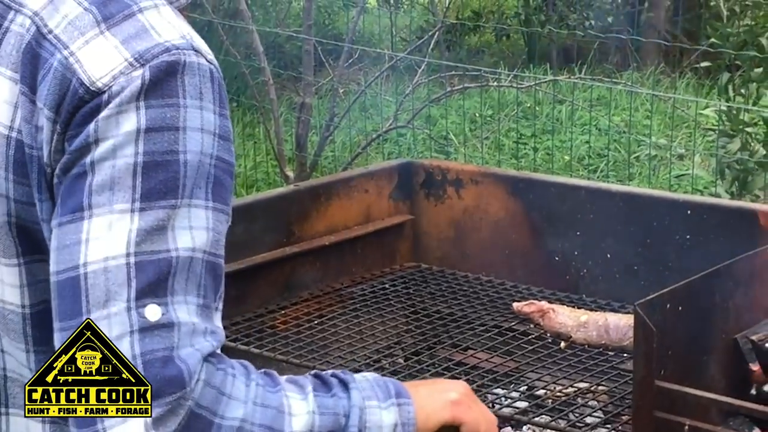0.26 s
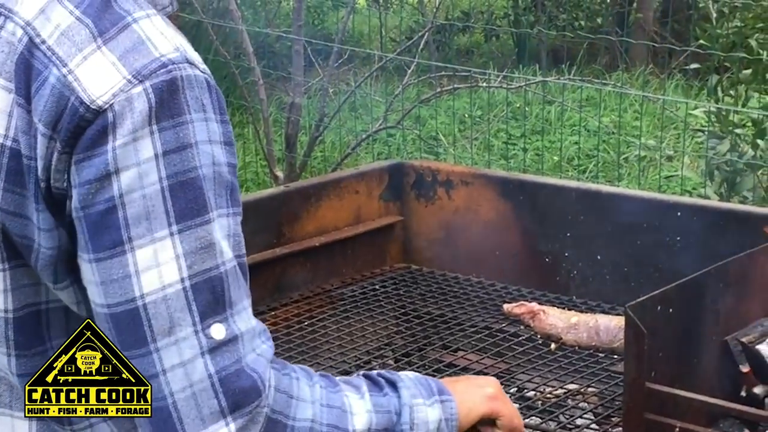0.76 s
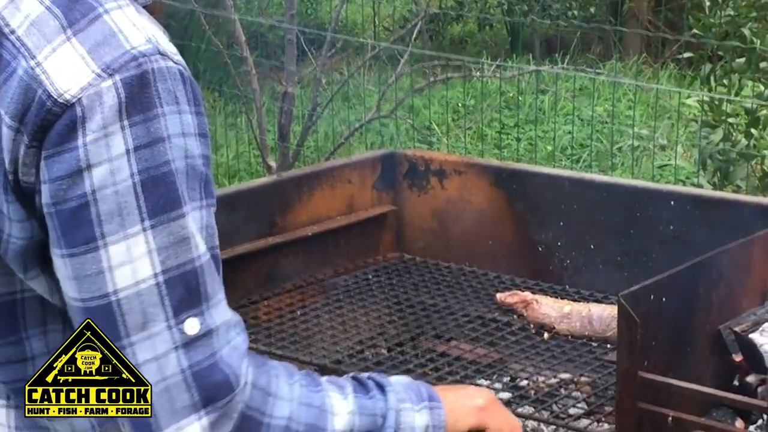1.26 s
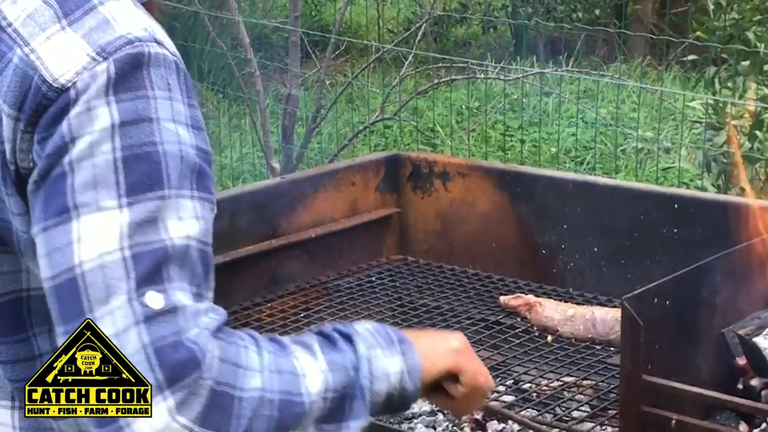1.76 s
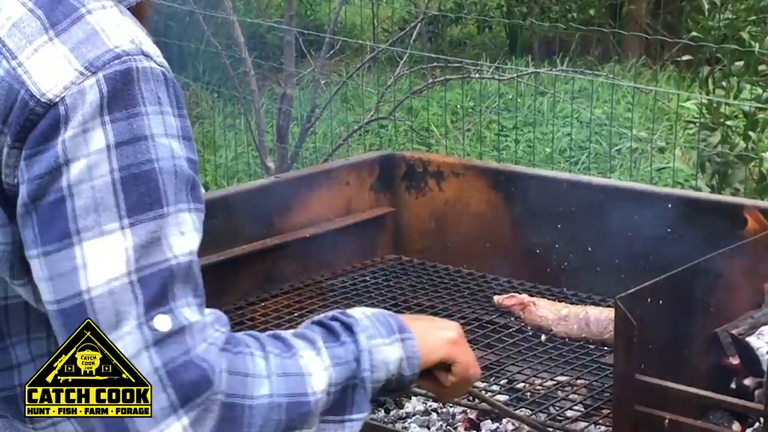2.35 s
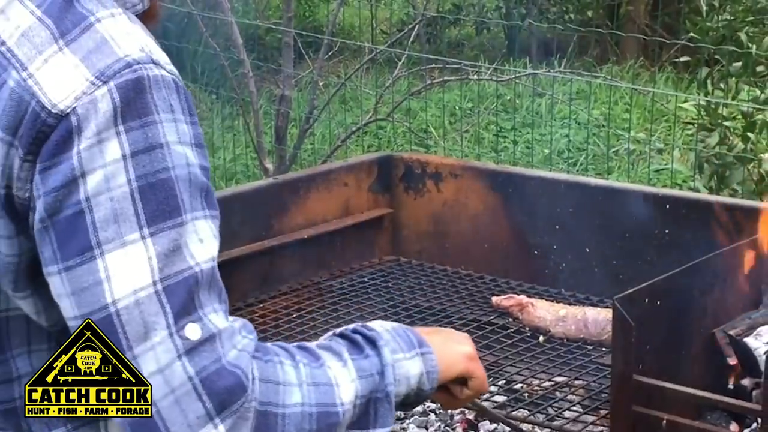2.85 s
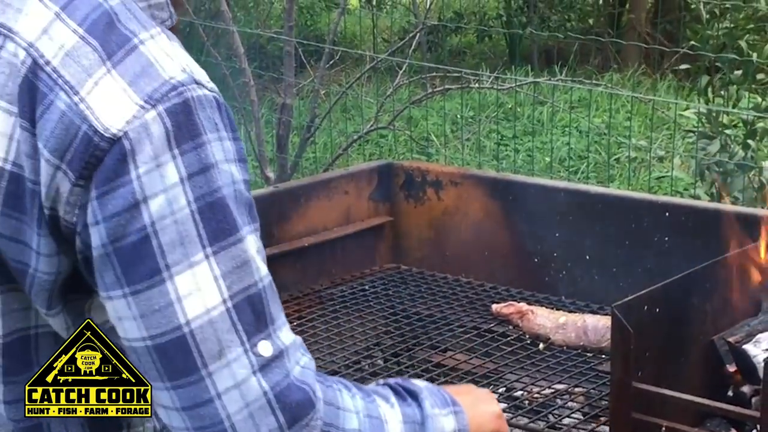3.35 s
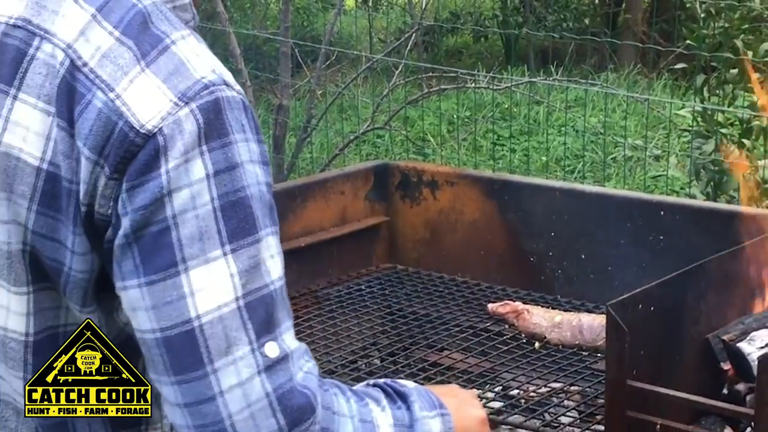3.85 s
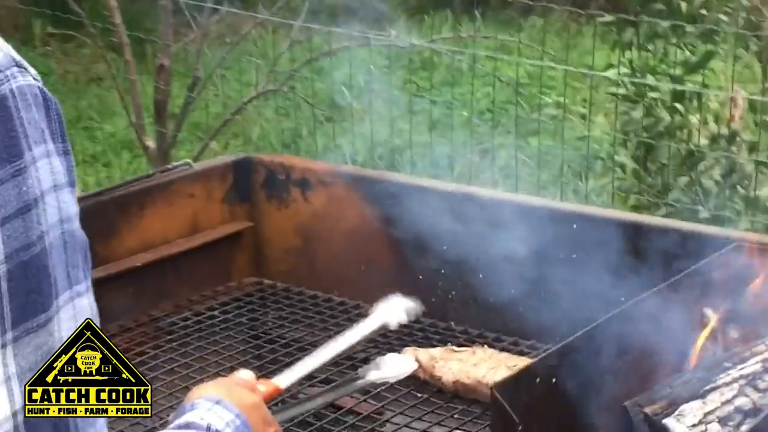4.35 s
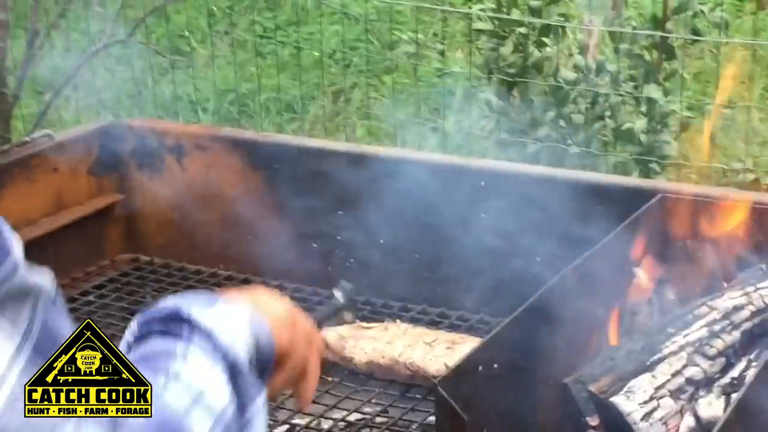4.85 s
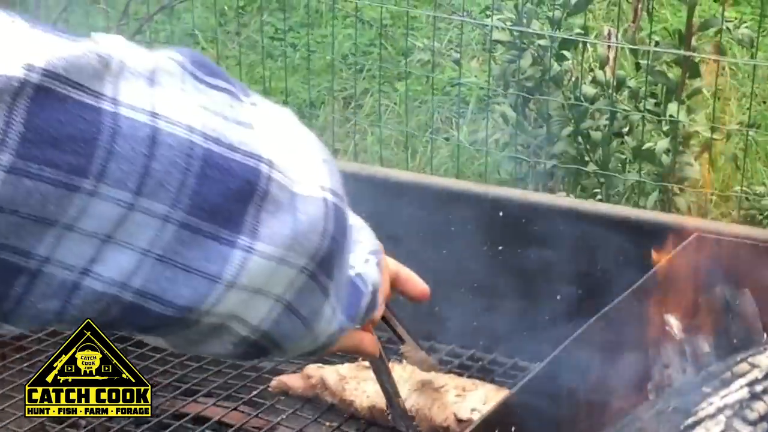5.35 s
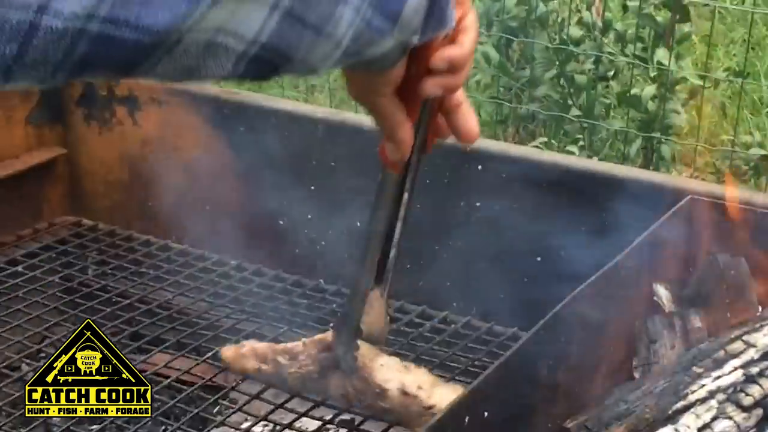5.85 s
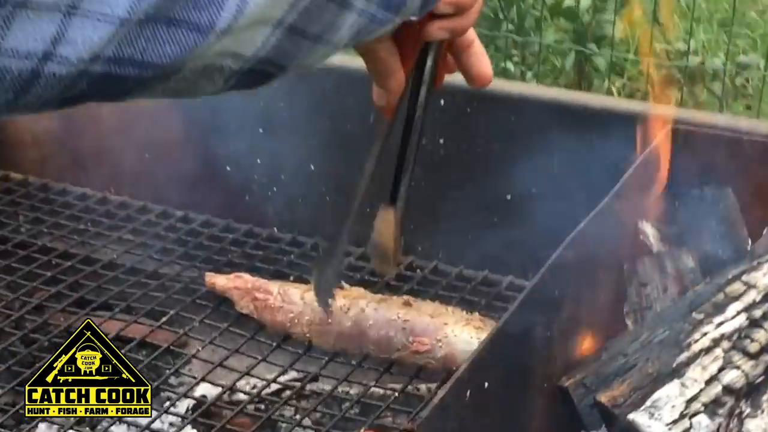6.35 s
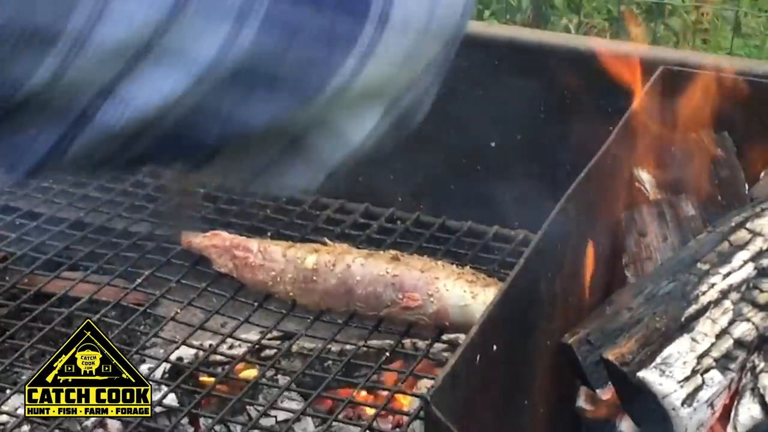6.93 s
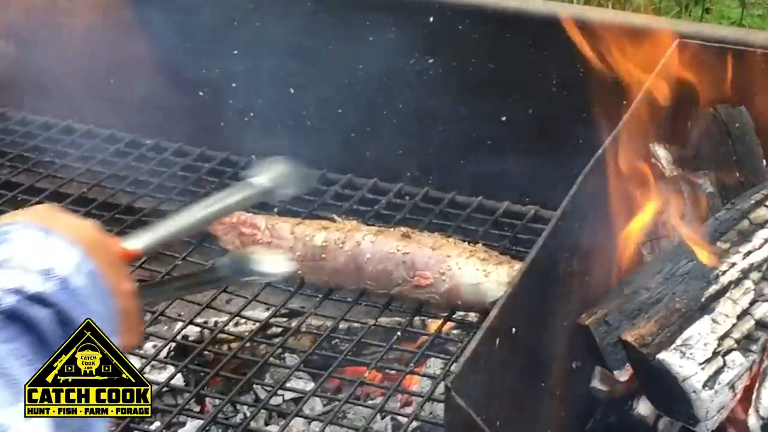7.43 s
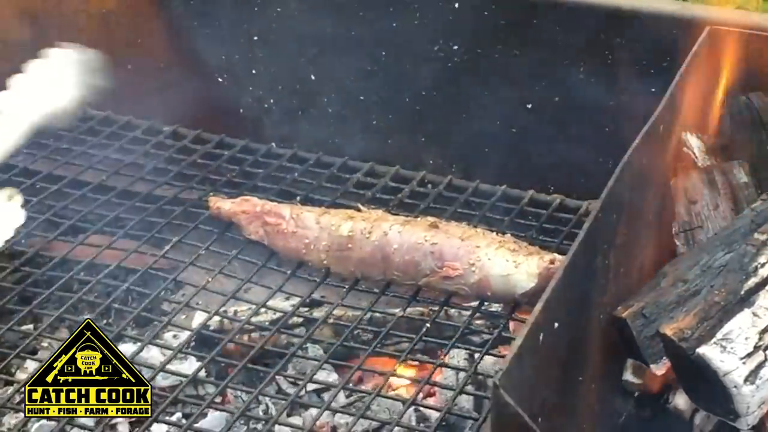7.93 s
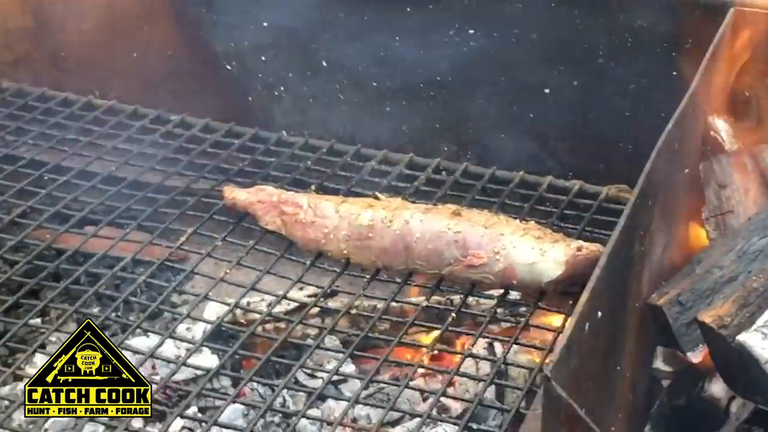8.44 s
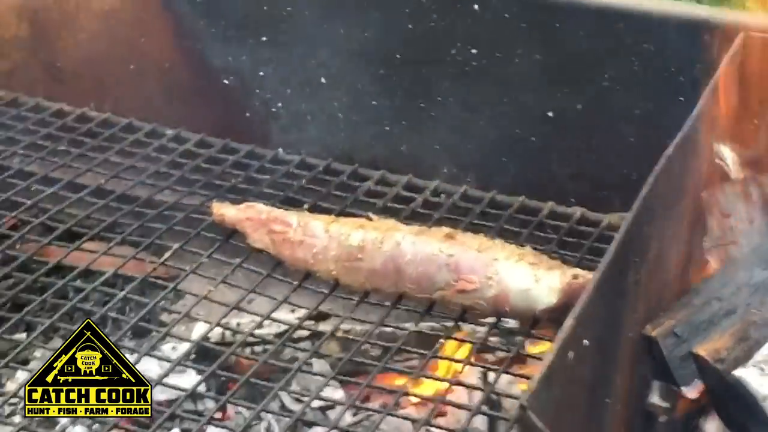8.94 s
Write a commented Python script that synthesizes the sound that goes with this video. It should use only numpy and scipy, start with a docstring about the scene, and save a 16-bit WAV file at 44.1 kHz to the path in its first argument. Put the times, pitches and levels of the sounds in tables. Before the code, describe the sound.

Close outdoors, steel tongs strike a grill grate and its sheet-metal sides in irregular clanks, dull thuds and small ticks for four seconds, over faint flame rumble. A fine sizzle then comes nearer, with spits and short scrapes. A hard snap of the tongs rings out as the meat is turned, and the sizzle flares, settling into steady bright frying with sharp pops and fire flutter.

```python
"""Tongs on an outdoor grill

Steel tongs knock and scrape about the grate of a wood-fired grill, close to the microphone in open air.
Each blow rings modes of the grate and sheet-steel firebox; the tongs snap shut and the meat is turned.
Its wet side sizzles as showers of random grains and spits as noise puffs, over the soft flutter of flames.
"""
import sys
import numpy as np
from scipy import signal
from scipy.fft import rfft, irfft, next_fast_len
from scipy.io import wavfile

SR = 44100
rng = np.random.default_rng(int(sys.argv[2]) if len(sys.argv) > 2 else 0)


def unload_wav(signal):
    """Save mono or channel-first audio to the path in sys.argv[1] as 16-bit WAV at rate SR, clipped to [-1, 1]."""
    wavfile.write(
        sys.argv[1],
        SR,
        np.round(np.clip(np.atleast_2d(signal).T, -1, 1) * 32767).astype(np.int16),
    )


N = 405279
TIME = np.arange(N) / SR

# Blows. A blow clangs up to the frequency at which the tip springs on the steel; its weight thuds in the bass.
TIP_Q, CLANG_LOW_HZ, THUD_HZ = 1.26, 420, 333
CHAR_DB = -71.5  # faint tick of char crushed at every contact
BEND_SPEED = 5.4  # bending waves in the steel travel at this many m/s times the root of their Hz
NODE_SHARE = 0.14  # power that a mode still takes when struck at a node
# how each struck part shares its blow: part -> (grate [dB], firebox [dB], side wall [dB])
PART_COUPLING = {"grate": (0.33, -29, -14.5), "box": (-5, 4.9, -12), "wall": (-7, -11, 4)}
# knocks of the tongs, and a late tap or wood pop: (time [s], struck part, spot from the edge [m],
# clang [dB], tip [Hz], thud [dB], contact [ms], ring length [factor], flexing [dB])
BLOWS = [ (0.000, "grate", 0.19, -50.5, 3060, -44, 0.34, 1.22, -44.5),
         (0.095, "wall", 0.32, -55.5, 1800, -49, 4.5, 0.99, -45.5),
         (0.416, "wall", .189, -43, 1630, -50, 5.9, 1.04, -66),
         (0.492, "grate", 0.14, -38, 5000, -40.5, 1.9, 1.18, -50),
         (0.604, "grate", .572, -62.5, 3800, -43.5, 4.8, 0.52, -76),
         (0.674, "box", .586, -59.5, 2300, -54, 17, 0.49, -67.5),
         (0.912, "box", 0.047, -68, 2100, -42.5, 1, 0.39, -59.5),
         (1.041, "grate", 0.4, -78, 2500, -61, 13, 0.64, -68),
         (1.283, "box", 0.13, -37.5, 1100, -45, 5.5, 1.2, -59),
         (1.401, "wall", .57, -55.5, 6360, -40, 1.7, 0.87, -78),
         (1.516, "box", .589, -67.5, 8550, -52.5, 23, 1.3, -74),
         (1.612, "box", .311, -66, 3880, -54, 5.6, 1.25, -72),
         (1.868, "box", 0.28, -61.5, 2300, -40.5, 1.7, 0.47, -54),
         (1.994, "grate", .342, -33.5, 5000, -40.5, 1.4, 1.08, -59),
         (2.120, "wall", 0.38, -62.5, 3700, -48, 5.4, 1.6, -73),
         (2.165, "grate", .448, -53, 4700, -45.5, 6, 1.4, -71),
         (2.222, "wall", .535, -55, 1600, -47, 13, 0.75, -78),
         (2.271, "wall", 0.084, -54.5, 3400, -40.5, 12, 0.7, -77),
         (2.448, "wall", 0.425, -47.5, 2530, -48.5, 7.4, 1.24, -41.5),
         (2.622, "grate", 0.45, -33, 4960, -36, 1.6, 1.05, -45),
         (2.766, "grate", .352, -61.5, 7550, -46.5, 6.6, 3.6, -57),
         (2.851, "wall", .525, -42.5, 5500, -39.5, 6.9, 1.24, -42),
         (2.977, "grate", 0.17, -59.5, 2800, -53, 2.8, 0.36, -66),
         (3.366, "wall", .224, -55, 810, -60, 0.72, 0.37, -80),
         (3.396, "wall", .586, -69.5, 2430, -50.5, 2, 0.76, -71),
         (3.705, "wall", 0.055, -48.5, 2270, -53, 4, 1.11, -66),
         (3.943, "box", .291, -56.5, 1300, -67, 2.2, 0.48, -83),
         (3.967, "wall", .592, -63.5, 2080, -46, 1.4, 0.78, -71),
         (8.879, "wall", 0.44, -57, 1700, -70, 1.6, 0.18, -80)]
# modes of the grate: (frequency [Hz], level [dB], t60 before the ring length [s])
GRATE_MODES = [(355, -10, .35), (460, -11, .49), (625, -12, .28), (681, -10, .28), (748, -11, .25),
               (907, -9, .28), (934, -1.5, .48), (1110, -10, .3), (1449, -4, .35), (1529, -8, .29),
               (1631, -11, .24), (1830, -12, .18), (1925, -4, .22), (2043, -4, .2), (2303, -5, .23),
               (2355, -7, .2), (2494, -3.5, .27), (2848, -12, .16), (2898, -12, .2), (3168, -11, .19),
               (3591, -17, .17), (4237, -10, .15), (4428, -5.5, .14), (4896, -6.5, .14), (5505, -13, .14),
               (5750, -13, .13), (6456, -10, .14), (6777, -2.5, .11), (7262, -7, .08)]
# modes of the firebox: (frequency [Hz], level [dB], t60 before the ring length [s])
FIREBOX_MODES = [(368, -10, .3), (419, -2, .33), (511, -5, .27), (538, -2, .33), (584, -9, .25),
                 (791, -9, .28), (1012, -11, .4), (1720, -9, .16), (2106, -11, .2)]
# modes of the side wall: (frequency [Hz], level [dB], t60 before the ring length [s])
SIDE_WALL_MODES = [(289, -5, .45), (318, -8, .45), (581, -11, .3), (657, -9, .3), (885, -6, .28),
                   (1001, -10, .25), (1146, -9, .3), (1210, -5, .28), (1265, -7, .25), (1378, -11, .3),
                   (1510, -9, .25), (1652, -11, .2), (1781, -7, .2), (1868, -8, .18), (2130, -11, .18),
                   (2400, -10, .2), (2475, -10, .18), (3598, -8, .15)]
# the whole grate flexing in its frame: (frequency [Hz], level [dB], t60 before the ring length [s])
FLEX_MODES = [(256, -1, 1.15)]
# decay of the crowd of weaker steel modes: (frequency [Hz], t60 before the ring length [s])
CROWD_T60 = [(100, .35), (300, .38), (1000, .24), (2500, .15), (5000, .105), (8000, .085), (14000, .075)]
# strength of that crowd: (frequency [Hz], level per third octave [dB])
CROWD_LEVEL = [(60, -30), (125, -13), (200, -13.5), (300, -7), (500, -11.5), (1000, -7), (2200, -6),
               (3200, -6), (4100, -3), (5200, -5), (6500, -3), (8000, -3.5), (10500, -6.5), (15000, -2)]
# an even drive at all frequencies: (frequency [Hz], level [dB])
EVEN_DRIVE = [(100, 0), (10000, 0)]

# the flames grow louder as the microphone moves in over the grill: (time [s], level [dB])
FLAME_LEVEL = [(0, -61), (5.05, -62.5), (5.5, -55), (9.19, -55.5)]
# spectrum of the flames: (frequency [Hz], level [dB])
FLAME_SPECTRUM = [(20, -35), (35, -38), (55, -4), (100, -1.5), (155, 3), (195, -0.5), (240, -7.5),
                  (290, -4.5), (360, -15.5), (500, -22.5), (1000, -28)]
# spectrum of the open air: (frequency [Hz], level [dB])
AIR_SPECTRUM = [(15, -43), (30, -2), (55, 17), (110, 1.5), (400, -12), (650, -3), (1200, -2.5),
                (2000, -8.5), (4000, -11.5), (8000, -40), (16000, -29)]
AIR_DB = -68

SIMMER_DB = -74  # the meat lying undisturbed
SETTLED_DB, SETTLE_S, DRYING_DB_PER_S = -1.5, 0.73, 1.5  # how each rise of the sizzle dies down
FRY_DB, FRY_GROWTH = -49.5, 1.134  # coarse frying at the height of the sizzle; its dB per dB of fine fizz
# the sizzle comes nearer at 4 s, then flares as the meat is turned and set down:
# (time [s], level [dB], rise [s])
SIZZLE_RISES = [(4.0, -66.5, 0.21), (5.71, -53.5, 0.26), (6.12, -51.5, 0.16)]
# spectrum of the fine fizz: (frequency [Hz], level [dB])
FIZZ_SPECTRUM = [(1500, -40), (4000, -3), (6200, -1.5), (7700, -4.5), (9200, 3.5), (10500, -5), (11800, 2),
                 (16000, -5.5)]
# spectrum of the coarse frying: (frequency [Hz], level [dB])
FRY_SPECTRUM = [(400, -20), (900, -9), (1300, -8.5), (1750, 1.5), (2120, 3), (2350, -1.5), (3500, 0),
                (4900, -6), (5600, -0.5), (7500, -8.5), (12000, -2)]
# the loudest spits of fat, and the bright tick of the knock at 3.94 s: (time [s], level [dB], centre [Hz])
LOUD_SPITS = [(0.538, -45, 9000), (1.044, -52, 9100), (3.129, -55, 6900), (3.947, -49, 10000),
              (4.675, -47.5, 8900), (4.834, -48.5, 9000), (5.283, -47, 11000), (5.543, -45.5, 11000),
              (6.245, -40, 6460), (6.379, -35, 8000), (8.274, -42, 10200), (8.46, -37.5, 12100),
              (8.566, -33, 10900), (8.963, -40, 12000)]
SPIT_T60_S = 0.021

# steel dragged over the grate: (time [s], length [s], level [dB], top [Hz])
DRAGS = [(2.09, 0.28, -51, 6800), (5.396, 0.054, -45.5, 6050), (5.44, 0.17, -53.5, 6900),
         (5.52, 0.16, -54, 720), (8.705, 0.036, -52.5, 5070), (9.023, 0.032, -50.5, 5030)]
# spectrum of the dragging: (frequency [Hz], level [dB])
DRAG_SPECTRUM = [(100, -8), (250, -1.5), (650, -1), (950, -9), (1300, -6.5), (1600, -12.5), (2000, 1.5),
                 (3000, -14.5), (6000, -13), (15000, -15)]
# the tongs snap shut: (time [s], level [dB], pitch of the contact [Hz])
JAW_SNAPS = [(6.1328, -16.5, 4730), (7.9154, -38.5, 3030), (7.9556, -26, 2340)]
# modes of the tong arms: (frequency [Hz], level [dB], t60 before the ring length [s])
TONG_MODES = [(1120, -8.5, 0.031), (2180, -6.5, 0.024), (2780, -2.5, 0.014), (2880, -28, 0.077),
              (3460, -15.5, 0.093), (3540, -8, 0.032), (4760, -9, 0.025), (6100, -17, 0.04),
              (6790, 5.5, 0.014), (8899, -35, .04)]
TOP_HZ = 16050  # upper limit of the sound


def undb(db):
    """Decibels to gain."""
    return 10 ** (np.asarray(db) / 20)


def unit(x):
    """Scale to rms 1."""
    return x / np.sqrt(np.mean(x ** 2) + 1e-18)


def at_pitch(hz, points):
    """Read (Hz, value) points on a log-frequency axis."""
    f, value = np.transpose(points)
    return np.interp(np.log(hz + 1e-9), np.log(f), value)


def curves(rows):
    """Each column of a (time, ..) table at every sample."""
    s, *columns = np.transpose(rows)
    return [np.interp(TIME, s, column) for column in columns]


def colour(x, points):
    """Give x a (Hz, dB) spectrum; rms 1."""
    size = next_fast_len(len(x))
    hz = np.arange(size // 2 + 1) * SR / size
    spectrum = rfft(x, size) * undb(at_pitch(hz, points))
    return unit(irfft(spectrum, size)[:len(x)])


def band(x, hz, ratio, order=2):
    """Band-pass from hz / ratio to hz * ratio, kept below the Nyquist limit; rms 1."""
    edges = [min(hz / ratio, SR / 3), min(hz * ratio, SR / 2 - 100)]
    return unit(signal.sosfilt(signal.butter(order, edges, "band", fs=SR, output="sos"), x))


def walk(rate):
    """Random wander through `rate` chance values a second; rms 1."""
    knots = rng.standard_normal(4096)
    return unit(np.interp(TIME * rate, np.arange(len(knots)), knots))


def fade(t, t60):
    """Free decay, 60 dB in t60 seconds."""
    return np.exp(-np.log(1000) * t / t60)


def add(out, s, x):
    """Mix x into out from time s."""
    i = max(int(s * SR), 0)
    out[i:i + len(x)] += x[:N - i]


def grains(rate, spread_db):
    """Random clicks, `rate` a second on average: many small ones, a few large."""
    size = undb(spread_db * np.minimum(rng.exponential(size=N), 7))
    happens = rng.random(N) < rate / SR
    return happens * size * rng.choice([-1, 1], N)


def ring(modes, t, length, tint, scatter_db=1):
    """Decaying modes, weighted by the (Hz, dB) tint; each mode's level varies a little, its phase is random."""
    chance = rng.standard_normal((len(modes), 2))
    total = 0
    for (hz, db, t60), (luck, phase) in zip(modes, chance):
        gain = undb(db + at_pitch(hz, tint) + scatter_db * luck)
        total = total + gain * fade(t, t60 * length) * np.sin(2 * np.pi * (hz * t + phase))
    return total


def puff(t, hz, ratio, t60, order=2):
    """A short burst of band noise; rms 1 over its first two milliseconds."""
    lead = SR // 100  # lets the filter settle
    noise = band(rng.standard_normal(len(t) + lead), hz, ratio, order=order)[lead:]
    burst = noise * fade(t, t60)
    return burst / np.sqrt(np.mean(burst[:SR // 500] ** 2))


def blow(hz, clang_db, tip_hz, thud_db):
    """Strength (dB) with which a blow drives each frequency: springy tip, weight behind it, crushed char."""
    r = hz / tip_hz
    spring = 1 / ((1 - r ** 2) ** 2 + (r / TIP_Q) ** 2)
    clang = undb(clang_db) ** 2 * spring / (1 + (CLANG_LOW_HZ / hz) ** 2)
    thud = undb(thud_db) ** 2 / (1 + (hz / THUD_HZ) ** 4)
    return 10 * np.log10(clang + thud + undb(CHAR_DB) ** 2)


def struck_at(modes, spot_m):
    """Each mode is a standing bending wave: it answers most where the blow lands on one of its crests."""
    answering = []
    for hz, db, t60 in modes:
        swing = np.cos(2 * np.pi * spot_m * np.sqrt(hz) / BEND_SPEED) ** 2
        power = NODE_SHARE + 2 * (1 - NODE_SHARE) * swing
        answering.append((hz, db + 10 * np.log10(power), t60))
    return answering


def weak_modes():
    """Three seconds of steady partials of unequal strength, on average one every 25 Hz above 600 Hz."""
    size = 3 * SR // 2 + 1  # bins a third of a hertz apart
    strength = (rng.random(size) < 1 / 75) * undb(3 * rng.standard_normal(size))
    # below 600 Hz the modes crowd into an even, low rumble
    strength[:1800] = 0.17
    return irfft(strength * np.exp(2j * np.pi * rng.random(size)))


def knocks(modes_db=2.5, bass_lag_ms=3, blow_s=0.05, crack_db=3, crack_t60=0.026):
    """Each blow cracks, then rings the grate, the firebox, the side wall and a crowd of weaker steel modes."""
    out, t = np.zeros(N), np.arange(SR) / SR
    ms = t * 1000
    centres = 63 * 2 ** (np.arange(25) / 3)  # third octaves [Hz]
    partials = weak_modes()
    crowd = [band(partials, hz, 2 ** (1 / 6), order=3) for hz in centres]
    span = SR // 2
    short_t, short_ms = t[:span], ms[:span]
    for s, part, spot_m, clang_db, tip_hz, thud_db, contact_ms, length, flex_db in BLOWS:
        tint = list(zip(centres, blow(centres, clang_db, tip_hz, thud_db)))
        clear = undb(flex_db) * ring(FLEX_MODES, t, 0.98, EVEN_DRIVE)
        for db, modes in zip(PART_COUPLING[part], (GRATE_MODES, FIREBOX_MODES, SIDE_WALL_MODES)):
            clear = clear + undb(db) * ring(struck_at(modes, spot_m), t, length, tint)
        add(out, s, undb(modes_db) * clear * (1 - np.exp(-(ms / contact_ms) ** 2)))
        start = rng.integers(SR, 2 * SR)
        for hz, partial in zip(centres, crowd):
            # bending waves are slower in the bass, so the lows build up later
            rise_ms = contact_ms + bass_lag_ms * min(700 / hz, 1.5)
            rise = 1 - np.exp(-(short_ms / rise_ms) ** 2)
            # the treble leaves the contact point as a short crack before the ring takes over
            crack = undb(crack_db) * min(hz / 3500, 1) * fade(short_t, crack_t60)
            shape = rise * (crack + fade(short_t, at_pitch(hz, CROWD_T60) * length))
            shape /= np.sqrt(np.mean(shape[:int(blow_s * SR)] ** 2))
            gain = undb(at_pitch(hz, tint) + at_pitch(hz, CROWD_LEVEL))
            add(out, s, gain * shape * partial[start:start + span])
    return out


def fire(flutter_db=1.5):
    """Flames flutter with a low, hollow rumble in the firebox: coloured noise of wandering level."""
    flame_db, = curves(FLAME_LEVEL)
    rumble = colour(rng.standard_normal(N), FLAME_SPECTRUM)
    return undb(flame_db + flutter_db * walk(rate=24)) * rumble


def garden(sway_db=1):
    """Quiet open air: coloured noise whose level sways."""
    air = colour(rng.standard_normal(N), AIR_SPECTRUM)
    return undb(AIR_DB + sway_db * walk(rate=8.1)) * air


def boiling():
    """Level of the sizzle (dB): each rise builds up, settles and slowly dies down, over a faint simmer."""
    power = undb(SIMMER_DB) ** 2
    for s, db, rise_s in SIZZLE_RISES:
        age = np.maximum(TIME - s - rise_s, 0)
        sag_db = SETTLED_DB * (1 - np.exp(-age / SETTLE_S)) - DRYING_DB_PER_S * age
        rise = np.clip((TIME - s) / rise_s, 0, 1)
        power = power + (rise * undb(db + sag_db)) ** 2
    return 10 * np.log10(power)


def sine_grains(count=3500, cycles=160, spread_db=3):
    """Short sine grains at random high pitches, making the fizz livelier; rms 1."""
    out, t = np.zeros(N), np.arange(SR // 50) / SR
    for when, pitch, luck in rng.random((count, 3)):
        hz = 3000 + 12500 * pitch
        size = undb(spread_db * min(-np.log(1 - luck), 4))  # many small, a few large
        add(out, when * N / SR, size * np.sin(2 * np.pi * hz * t) * fade(t, cycles / hz))
    return unit(out)


def sizzle(fizz_flicker_db=1.5, fry_flicker_db=2.5, crackle_db=-11, sines_db=-6):
    """Thousands of tiny steam bubbles burst each second; coarser ones fry where the meat touches the bars."""
    fizz_db = boiling()
    fry_db = FRY_DB + FRY_GROWTH * (fizz_db - fizz_db.max())
    t = np.arange(SR // 100) / SR
    burst = rng.standard_normal(len(t)) * fade(t, 0.013)
    fizz = colour(grains(rate=24000, spread_db=4), FIZZ_SPECTRUM)
    bursts = signal.fftconvolve(grains(rate=600, spread_db=4), burst)[:N]
    crackle = colour(bursts, FIZZ_SPECTRUM)
    sines = colour(sine_grains(), FIZZ_SPECTRUM)
    fine = unit(fizz + undb(crackle_db) * crackle + undb(sines_db) * sines)
    fry = colour(grains(rate=9000, spread_db=3.5), FRY_SPECTRUM)
    surge = walk(rate=21)  # shared by the fizz and the frying
    fry_flicker = (surge + walk(rate=69)) / 2
    return (undb(fizz_db + fizz_flicker_db * surge) * fine
            + undb(fry_db + fry_flicker_db * fry_flicker) * fry)


def spits(count=22, faint_hz=8000, over_sizzle_db=7):
    """Fat spits in sharp puffs of band noise; fainter ones come at random, just above the sizzle."""
    out, t = np.zeros(N), np.arange(SR // 8) / SR
    sizzle_db = boiling()
    faint = [(i / SR, sizzle_db[i] + over_sizzle_db, faint_hz) for i in rng.integers(0, N, count)]
    for s, db, hz in [*LOUD_SPITS, *faint]:
        add(out, s, undb(db) * puff(t, hz, 1.68, SPIT_T60_S, order=1))
    return out


def scrapes(wall_db=-11):
    """The tips stick and slip over the bars, each slip ringing the side wall briefly."""
    out, t = np.zeros(N), np.arange(SR // 4) / SR
    tick = np.eye(1, len(t))[0] * 20  # the dry slip itself, ahead of the ringing wall
    body = tick + undb(wall_db) * ring(SIDE_WALL_MODES, t, 0.26, EVEN_DRIVE)
    slips = signal.fftconvolve(grains(rate=500, spread_db=3), body)[:N]
    slips = colour(slips, DRAG_SPECTRUM)
    for s, length, db, top_hz in DRAGS:
        # a trace of the slips stays before and after the drag
        knots_s = [s, s + 0.013, s + length / 2, s + length + 0.017]
        pressure = np.interp(TIME, knots_s, [0.022, 0.79, 1.0, 0.0067])
        low_pass = signal.butter(2, top_hz, fs=SR, output="sos")
        out += undb(db) * pressure * signal.sosfilt(low_pass, slips)
    return out


def snaps(crack_db=-3, crack_t60=0.0085, modes_db=-2, skirt_db=-9, close_s=0.0074):
    """The jaws meet: a short crack and a ring damped by the hand."""
    out, t = np.zeros(N), np.arange(SR // 4) / SR
    for s, db, hz in JAW_SNAPS:
        tint = [(hz / 4, 2 * skirt_db), (hz / 2, 0), (hz, 0), (hz * 2, skirt_db)]
        crack = undb(crack_db) * puff(t, hz, 1.63, crack_t60)
        arms = undb(modes_db) * ring(TONG_MODES, t, 0.98, tint)
        add(out, s, undb(db) * (crack + arms) * (1 - fade(t, close_s)))
    return out


def scene():
    """Everything within an arm's length or two, with no walls around."""
    return (knocks() + fire() + garden() + sizzle() + spits() + scrapes() + snaps())[None]


def record(dry):
    """A steep low-pass ends the treble near 16 kHz."""
    return signal.sosfilt(signal.ellip(10, 0.2, 70, TOP_HZ, fs=SR, output="sos"), dry)


dry = scene()
out = record(dry)
unload_wav(out)
```